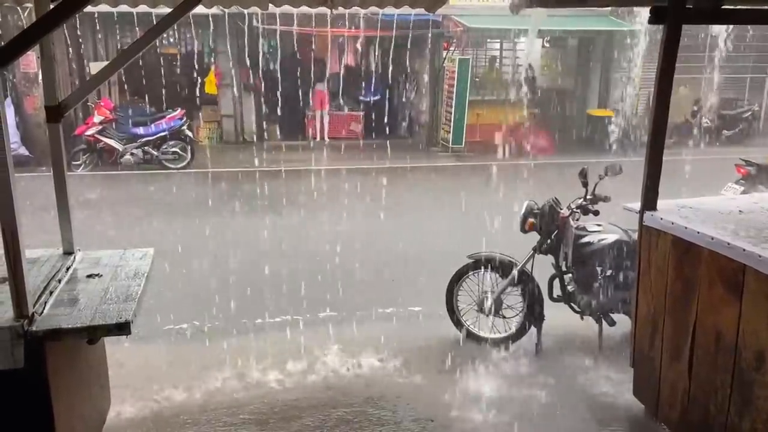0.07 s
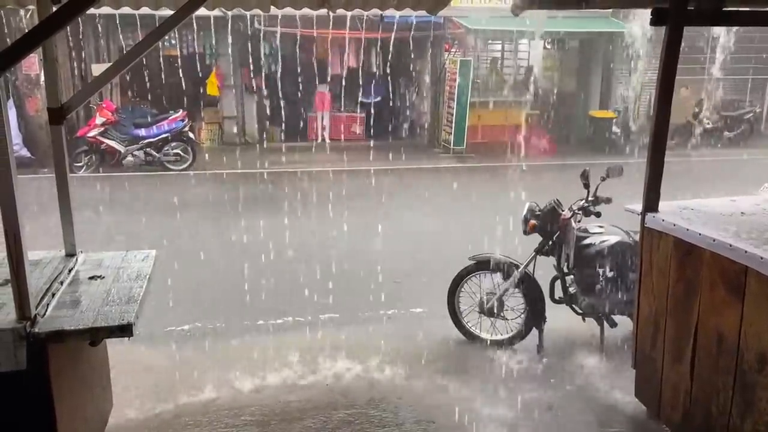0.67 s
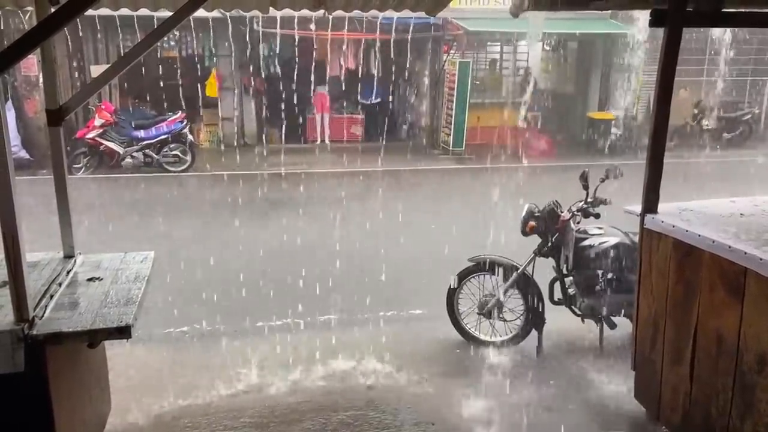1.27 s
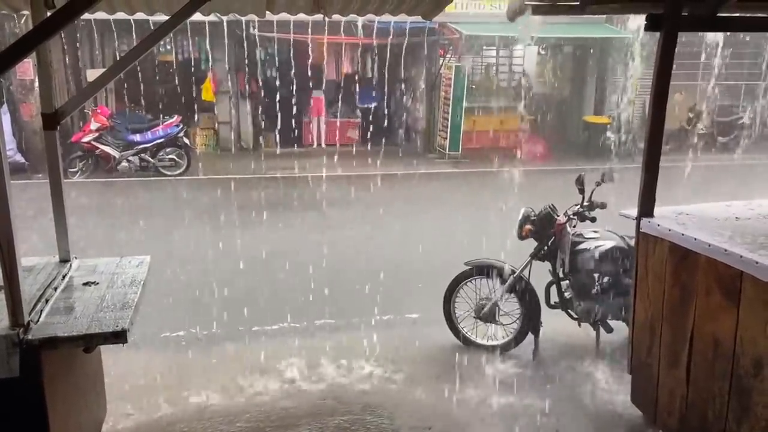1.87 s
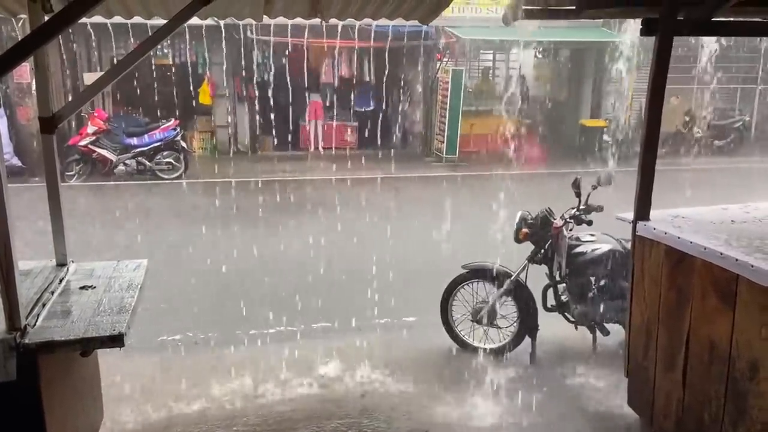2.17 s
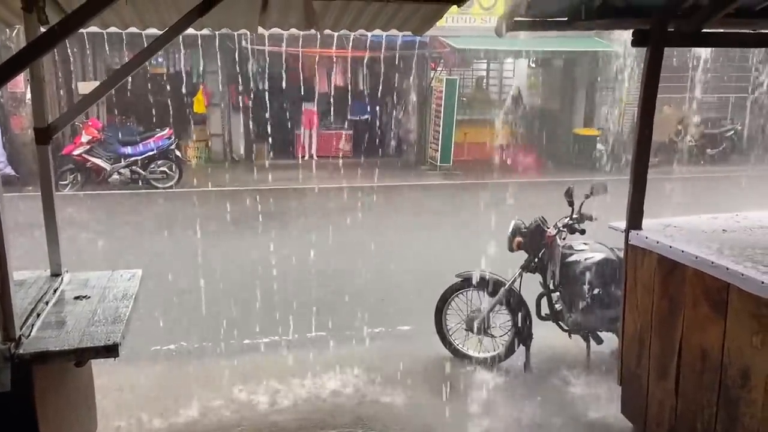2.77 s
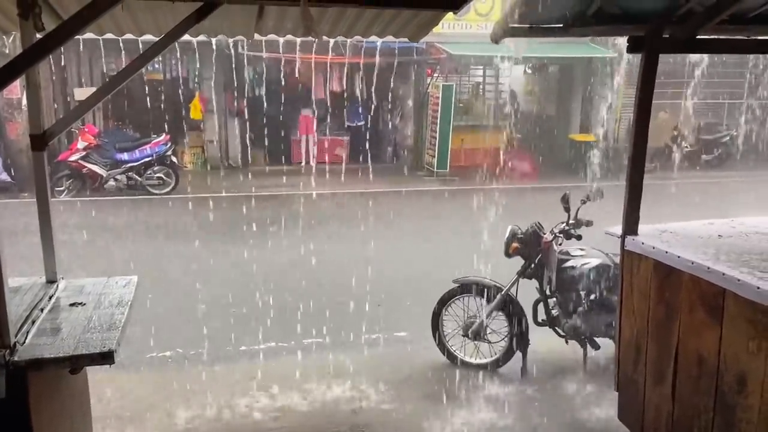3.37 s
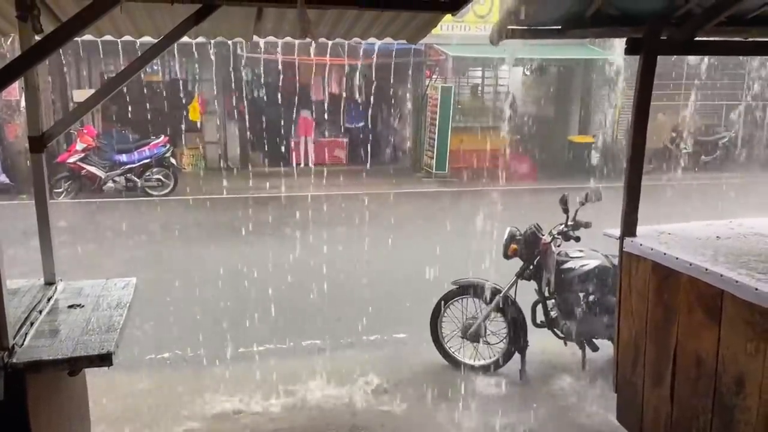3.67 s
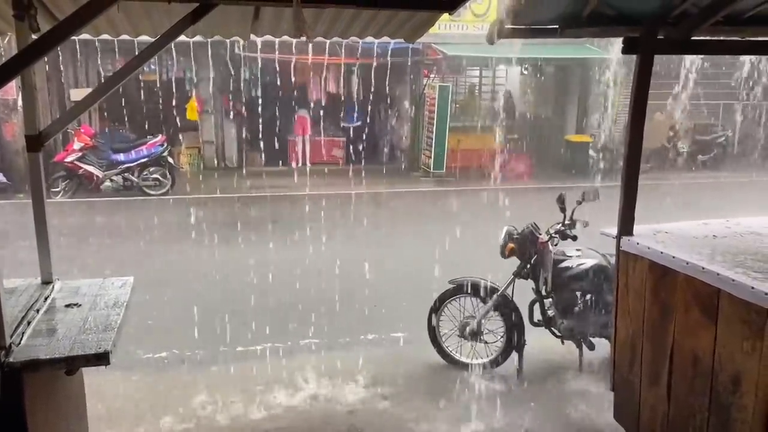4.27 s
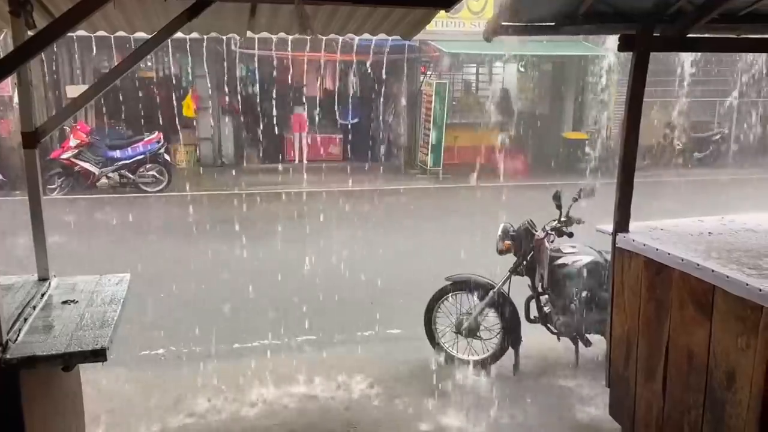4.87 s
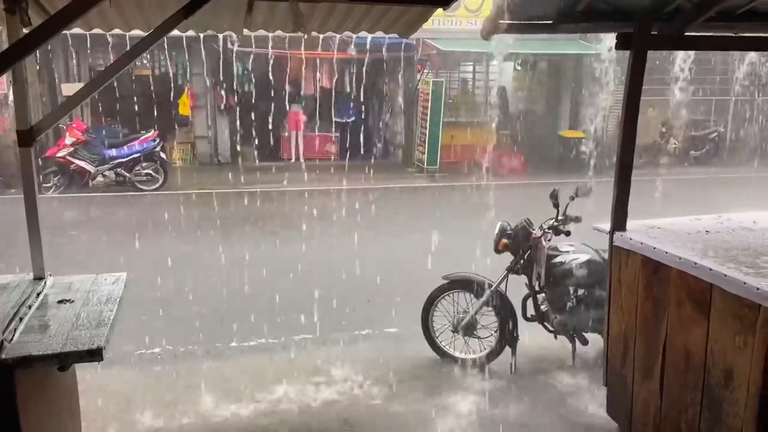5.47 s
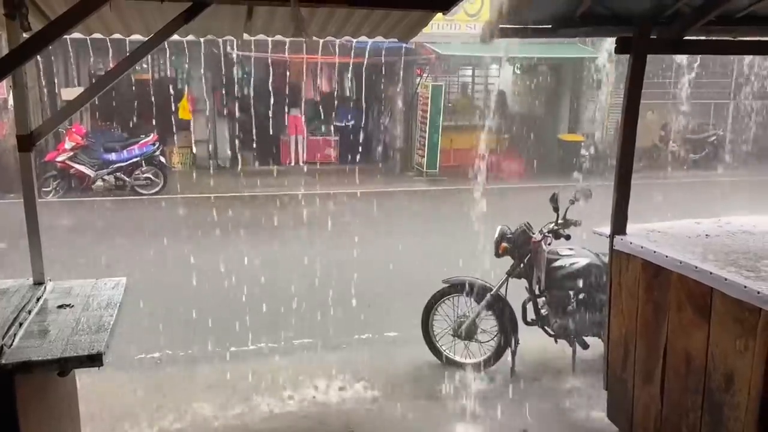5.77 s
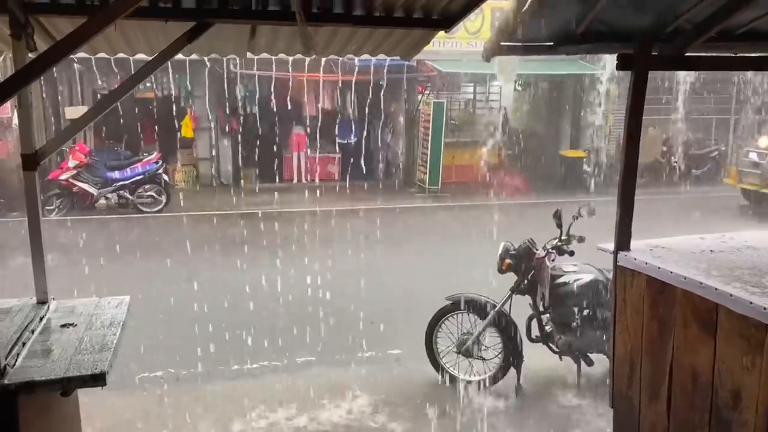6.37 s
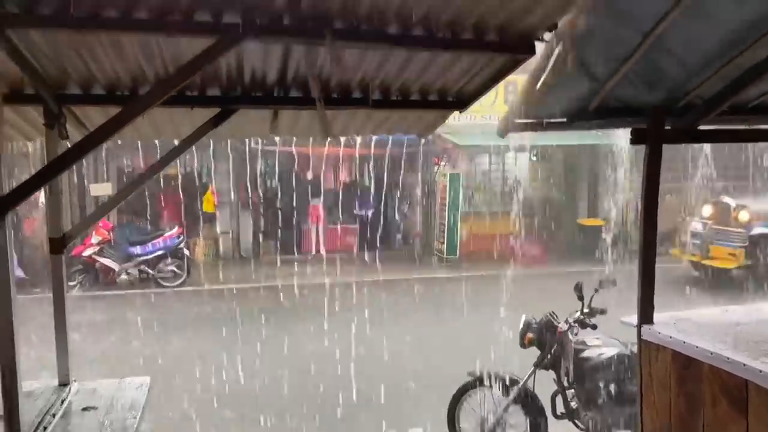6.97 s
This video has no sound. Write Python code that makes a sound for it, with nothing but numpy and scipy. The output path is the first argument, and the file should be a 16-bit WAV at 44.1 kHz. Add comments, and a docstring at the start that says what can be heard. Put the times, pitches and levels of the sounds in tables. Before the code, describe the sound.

A dense downpour drums on a metal roof just above a phone microphone at the side of a street. Run-off spatters and bubbles in the puddles close by, over a wide hiss of rain on the road. Big drips tap the tin at uneven moments. Beneath the rain two distant engines hum, one coming nearer, shifting gear and easing off near the end. The rain never lets up.

```python
"""A downpour drums on a tin roof overhead, heard from under it beside a street, on a two-port phone.
Dense drops push and ring the sheets, fat drips knock on them and heavy water thuds where they are slack.
In front, run-off from the eaves splashes and bubbles in the puddles; spray hisses from both sides.
Down the street one engine drones and another pulls closer through a gear change.
The phone limits the peaks."""
import sys
import numpy as np
from scipy import signal
from scipy.fft import rfft, irfft
from scipy.io import wavfile
from scipy.ndimage import uniform_filter1d, minimum_filter1d, map_coordinates

SR = 44100
rng = np.random.default_rng(int(sys.argv[2]) if len(sys.argv) > 2 else 0)


def dump(signal):
    """Clip the signal to [-1, 1] and save it as 16-bit WAV at the path in sys.argv[1]."""
    limited = np.clip(np.atleast_2d(signal).T, -1, 1)
    pcm = np.round(limited * 32767).astype(np.int16)
    wavfile.write(sys.argv[1], SR, pcm)


N = 310023
TIME = np.arange(N) / SR
FREQ = np.maximum(np.fft.rfftfreq(N, 1 / SR), 1)
LEFT_RIGHT = np.array([[1], [-1]])

# The engine droning down the street, its driver easing on and off the pedal.
# Each row: time in seconds, firing rate in Hz, relative level in dB.
DRONING_ENGINE = [(0, 99.4, -26), (0.3, 107.2, -25), (0.5, 111.7, -19), (0.77, 115, -16.5),
                  (1.02, 106.7, -20), (1.3, 113, -20), (1.68, 115.2, -26), (1.9, 114, -21),
                  (2.35, 110.5, -20), (2.55, 112, -26), (2.75, 114, -20), (3.05, 110.9, -25),
                  (3.35, 111.7, -24), (3.65, 117, -23), (4.1, 116.4, -41), (4.45, 111.2, -15.5),
                  (4.85, 110, -17.5), (5.35, 110.6, -20), (5.65, 108.9, -30), (5.95, 113.2, -18),
                  (6.12, 109.8, -26), (6.24, 108.8, -15.5), (6.6, 109.5, -18.5), (7.03, 111.3, -25)]
# The engine coming closer, which changes gear once and then lifts off.
# Each row: time in seconds, firing rate in Hz, relative level in dB.
APPROACHING_ENGINE = [(0.0, 135, -36), (1.2, 137, -29), (2.4, 134.7, -26), (2.8, 136.0, -23.5),
                      (3.3, 135.0, -27), (3.55, 141.6, -20), (3.8, 97.6, -31), (4.2, 95.1, -18),
                      (4.4, 98.3, -30), (4.65, 115.0, -32), (4.9, 119.7, -16), (5.15, 126.4, -18),
                      (5.45, 121.2, -21), (5.72, 123.0, -18.5), (6.0, 129.6, -22), (6.25, 100.0, -27),
                      (7.03, 96.0, -34)]
# The exhaust note. Each entry: relative level in dB of a multiple of the firing rate, from the first.
EXHAUST_ORDERS = [4, -19, -20.5, -17.5]

# How hard it rains on roof and street alike. Each row: time in seconds, relative strength in dB.
RAIN_STRENGTH = [(0, -0.5), (0.8, -0.5), (1.4, 0), (2.6, -0.1), (4.0, 0.5), (4.8, -0.8), (5.5, 0.5),
                 (7.03, 0.8)]
# Fine spray off the road. Each row: frequency in Hz, relative level in dB.
SPRAY_SPECTRUM = [(600, -72), (1600, -61), (2600, -65), (4000, -63), (5500, -64.5), (7000, -62.5),
                  (8500, -61.3), (11000, -64.2), (13000, -64), (15500, -64)]
# Surges and lulls over the eaves.
# Each row: middle in seconds, relative change of flow in dB, half length in seconds.
EAVES_SURGES = [(0.525, -1.5, 0.054), (0.93, -1.7, 0.046), (1.285, -2, 0.025), (1.991, -2, 0.032),
                (2.481, 0.5, 0.09), (2.952, -0.5, 0.027), (3.549, -1, 0.025), (3.902, 1.6, 0.076),
                (4, -2, 0.027), (4.736, 2.5, 0.029), (5.07, -2.5, 0.029), (5.521, 0.5, 0.1)]
# Run-off hitting the puddles in front. Each row: frequency in Hz, relative level in dB.
SPLASH_SPECTRUM = [(300, -64.5), (800, -54), (1300, -51.5), (1700, -56), (2250, -53.5), (3000, -58.5),
                   (4200, -59), (5500, -60.5), (7000, -62.5), (9000, -110), (16000, -64)]
# Fat gushes landing in the puddles.
# Each row: start in seconds, relative level in dB, length in seconds, centre pitch in Hz.
PUDDLE_GUSHES = [(0.036, -6, 0.1, 5200), (0.098, -4, 0.076, 2400), (0.345, -2, 0.06, 3000),
                 (1.202, 0, 0.043, 4800), (1.446, 0, 0.06, 4500), (2.149, -4, 0.049, 2430),
                 (2.246, 0, 0.041, 5500), (2.496, 1.5, 0.089, 4625), (2.825, 3, 0.05, 5200),
                 (3.08, -4, 0.046, 4800), (3.17, -1, 0.062, 2800), (3.39, -3, 0.066, 4200),
                 (3.64, -1, 0.05, 5030), (3.806, -4, 0.082, 4210), (3.897, -2, 0.06, 2290),
                 (4.072, 2, 0.026, 3200), (4.199, -1, 0.062, 2100), (4.277, -2, 0.04, 5500),
                 (5.272, -1, 0.07, 2303), (5.62, -1, 0.039, 5500), (5.96, -1, 0.069, 5200),
                 (6.43, 0, 0.046, 5000)]
# Big air pockets dragged under. Each row: start in seconds, relative level in dB, pitch in Hz.
AIR_GULPS = [(0.044, -4, 460), (0.268, -3, 483), (0.358, -6, 550), (0.806, -3, 555), (0.98, -10, 602),
             (1.115, -3, 432), (1.498, -4, 237), (1.8, -8, 213.3), (2.743, -9, 210), (2.831, -10, 585),
             (2.868, -4, 338.5), (3.094, -4, 408), (3.276, -5.5, 210), (3.395, -6, 259), (3.623, -8, 471),
             (3.869, -6, 254), (3.888, -3, 347.5), (3.912, -2, 350), (3.925, -6, 436), (3.94, -8, 283),
             (4.061, -4, 275), (4.363, -9, 466), (4.385, -10, 399), (4.535, -6, 236.4), (4.674, -10, 604),
             (5.293, -6, 300.7), (5.409, -4.5, 243), (5.45, -10, 256.6), (5.9, -5, 277.4),
             (6.365, -4.5, 350.5)]
# The bubbles nearest the phone. Each row: start in seconds, relative level in dB, pitch in Hz.
NEAR_PLINKS = [(0.063, -13, 4300), (1.162, -15, 2497), (1.306, -15, 2660), (1.465, -13, 3617),
               (1.493, -12, 3617), (2.481, -16, 4460), (3.204, -15, 3789), (3.854, -17, 3660),
               (3.894, -12, 2610), (3.933, -13, 2960), (4.228, -13, 2067)]

# Heavy water on the slack roof. Each row: start in seconds, relative level in dB, pitch in Hz.
ROOF_THUDS = [(0.048, -9, 112), (0.141, -3, 84.6), (0.224, -7, 62.3), (0.268, -8, 81), (0.362, -14, 58.6),
              (0.42, -1, 213), (0.648, -3, 162), (0.698, -2, 126), (0.75, -14, 61.6), (1.01, -15, 68),
              (1.095, -9, 65), (1.2, -19, 68), (1.244, -4, 180), (1.309, -4, 171), (1.95, -5, 172),
              (3.549, -2, 142), (4.135, -6, 160)]
# Big drips on the tin. Each row: start in seconds, relative level in dB, pitch of the spot in Hz.
DRIP_KNOCKS = [(0.036, -5.5, 1180), (0.055, -9, 1040), (0.377, -5, 980), (1.02, -9, 1065), (1.13, -7, 988),
               (1.155, -4, 970), (1.34, -6, 840), (1.424, -6, 800), (1.476, -6, 837), (1.64, -10, 1202),
               (1.792, -3, 991), (2.094, -12, 1080), (2.298, -4, 992), (2.56, -3, 917), (2.599, -3.5, 960),
               (2.641, -6, 1066), (2.833, -5, 994), (3.278, -4, 876), (3.314, -3, 1006), (3.347, -5, 950),
               (3.381, -5, 962), (3.435, -7, 1034), (3.487, -8, 1042), (3.61, -6, 1154), (3.664, -3, 1080),
               (3.741, -4, 866), (3.871, -5, 970), (3.936, -6, 1282), (4.08, -10, 1226), (4.222, -7, 1066),
               (4.243, -5, 874), (4.354, -8, 1186), (4.502, -6, 1090), (4.521, -14, 858), (5.017, -3, 1091),
               (5.027, 1, 1003), (5.04, -5, 1060), (5.051, -8, 890), (5.301, -5, 1100), (6.256, -5, 845),
               (6.294, -6, 870), (6.658, -9, 1096), (6.735, -4, 854), (6.953, -6, 1135), (7.0, -10, 1005)]
# The modes of the tin. Each row: pitch in Hz, width in Hz, relative level at the start in dB,
# change in dB per second as the rain shifts over the sheets.
TIN_MODES = [(372.6, 11, -3.5, -0.5), (733, 27, -5.5, -0.5), (852.5, 24, 1, 0.73), (951, 21, 2, -0.55),
             (988, 18, 1, 1), (1104, 69, -2, 0.07)]
# The boom of the sheets overhead. Each row: frequency in Hz, relative level in dB.
DRUM_SPECTRUM = [(20, -73), (32, -67), (45, -41), (60, -41), (85, -40.5), (120, -35.5), (160, -42.5),
                 (215, -39), (290, -44.5), (450, -43.5), (620, -49), (780, -45.5), (1200, -50),
                 (2000, -113)]
# How wide the drumming sits. Each row: frequency in Hz, side minus mid in dB.
DRUM_SPREAD = [(60, -20), (120, -17), (200, -12.5), (380, -7.5), (620, 0.5), (1000, -12.5)]
# The drumming leans right in the bass. Each row: frequency in Hz, left minus right in dB.
DRUM_BALANCE = [(60, -3.5), (120, 0), (380, -2), (600, 2.5), (1000, 0.5)]


def undb(db):
    """Decibels to gain."""
    return np.exp(np.asarray(db) * (np.log(10) / 20))


def unit(x):
    """Scale to rms 1."""
    return x / np.sqrt(np.mean(x ** 2))


def curves(table):
    """Each column of a time table, joined by straight lines."""
    times, *columns = np.transpose(table)
    return [np.interp(TIME, times, column) for column in columns]


def shape(points):
    """Gain at every frequency from (Hz, dB) points."""
    hz, db = np.transpose(points)
    return undb(np.interp(np.log(FREQ), np.log(hz), db))


def colour(x, points):
    """Give white sound of rms 1 a spectrum in dB per Hz."""
    return irfft(rfft(x) * shape(points) * np.sqrt(SR / 2), N)


def delay(x, lag_s):
    """Shift a sound later, as on its way to the farther microphone port."""
    return irfft(rfft(x) * np.exp(-2j * np.pi * FREQ * lag_s), N)


def walk(per_s):
    """Smooth chance of rms 1 that changes about per_s times a second."""
    knots = signal.resample_poly(rng.standard_normal(2048), 4, 1)
    return unit(np.interp(TIME * per_s * 4, np.arange(len(knots)), knots))


def drops(per_s, spread_db):
    """Impacts at random moments, with sizes scattered in dB."""
    hit = rng.random(N) < per_s / SR
    polarity = np.sign(rng.standard_normal(N))
    return unit(hit * polarity * undb(spread_db * rng.standard_normal(N)))


def clumps(x, low_hz, high_hz, clump_db, per_s, bands):
    """Drops land in clumps of like size, so each pitch range swells on its own."""
    hz, times, frames = signal.stft(x, SR, nperseg=256)
    band = np.interp(np.log(hz + 1), np.log([low_hz, high_hz]), [0, bands - 1])
    grid = np.meshgrid(band, times * per_s, indexing="ij")
    swell = map_coordinates(rng.standard_normal((bands, 2048)), grid, order=1)
    _, clumped = signal.istft(frames * undb(clump_db * swell), SR)
    return unit(clumped[:, :N])


def add_ring(out, start_s, hz, gain, cycles, rise=0, onset=0):
    """Add a tone that decays over some cycles; onset is a share of that decay, rise a share of pitch."""
    start = int(start_s * SR)
    t = TIME[:min(int(5 * cycles / hz * SR), N - start)]
    age = hz * t / cycles
    build = 1 - np.exp(-age / onset) if onset > 0 else 1
    tone = np.sin(2 * np.pi * hz * t * (1 + rise * age / 2))
    out[:, start:start + len(t)] += gain * build * np.exp(-age) * tone


def rings(events, gain_db, cycles, rise=0, onset=0):
    """One dying tone for each (start, level, pitch) row, alike at both ports."""
    out = np.zeros((2, N))
    for start_s, db, hz in events:
        add_ring(out, start_s, hz, undb(db + gain_db), cycles, rise, onset)
    return out


def pan(place):
    """Equal-power gains of the two ports, from 0 (right) to 1 (left)."""
    return np.sqrt([[place], [1 - place]])


def pips(count, low_hz, high_hz, cycles, spread_db, small_db, rise=0):
    """Short rings at random moments and places; the smaller their cause, the higher and fainter."""
    out = np.zeros((2, N))
    for (when, smallness, place, push), loud in zip(rng.random((count, 4)), rng.standard_normal(count)):
        hz = low_hz * (high_hz / low_hz) ** smallness
        gain = np.sign(push - .5) * undb(spread_db * min(loud, 2) + small_db * smallness)
        add_ring(out, when * N / SR, hz, gain * pan(place), cycles, rise)
    return unit(out)


def engine(drive, gain_db=0.5, waver=0.0027, rough_db=-0.3, lope=0.12, half_order_db=-16):
    """A six-cylinder exhaust far down the street: only its lowest orders carry through the rain."""
    firing_hz, db = curves(drive)
    phase = 2 * np.pi * np.cumsum(firing_hz * (1 + waver * walk(per_s=13.1))) / SR
    note = sum(undb(order_db) * np.sin(k * phase) for k, order_db in enumerate(EXHAUST_ORDERS, 1))
    # unequal cylinders make it putter once in six firings and alternate strong and weak
    note = note * (1 + lope * np.cos(phase / 6)) + undb(half_order_db) * np.sin(phase / 2)
    return unit(note) * undb(db + gain_db + rough_db * walk(per_s=19))


def shower(depth, flutter_db, per_s):
    """Gain of a layer that follows the strength of the rain and flutters by chance."""
    rain_db, = curves(RAIN_STRENGTH)
    return undb(depth * rain_db + flutter_db * walk(per_s))


def spray(flicker_db=0.46, port_lag_s=1 / 3700):
    """Fine droplets hiss from up and down the street and reach the far port a little late."""
    sides = np.array([drops(per_s=12000, spread_db=1.5) for _ in range(2)])
    ports = sides + delay(sides[::-1], port_lag_s)
    hiss = clumps(ports, low_hz=2860, high_hz=14800, clump_db=2.0, per_s=110, bands=24)
    return colour(hiss, SPRAY_SPECTRUM) * undb(flicker_db * walk(per_s=300))


def surges():
    """Relative flow off the eaves in dB: each surge or lull builds and passes."""
    return sum(db * np.exp(-((TIME - middle_s) / half_s) ** 2) for middle_s, db, half_s in EAVES_SURGES)


def splashes(side_db=-1.5, flutter_db=0.42, gain_db=1.07):
    """Strings of water off the eaves hit the puddles unevenly, in front of the phone."""
    mid, side = (drops(per_s=14000, spread_db=2.5) for _ in range(2))
    ports = mid + LEFT_RIGHT * undb(side_db) * side
    impacts = clumps(ports, low_hz=672, high_hz=8950, clump_db=2.0, per_s=85, bands=36)
    return colour(impacts, SPLASH_SPECTRUM) * undb(gain_db + flutter_db * walk(per_s=28))


def spatter(gain_db=-29.5):
    """Separate drops off the eaves smack the wet ground close by, each a very short pip."""
    smacks = pips(count=1600, low_hz=1400, high_hz=6000, cycles=3.8, spread_db=3.0, small_db=-4)
    return undb(gain_db) * smacks


def shelter(x, echo_db=-0.5, decay_s=0.006):
    """Roof, counter and wet ground around the phone throw each smack back at once and soften its edge."""
    t = TIME[:SR // 20]
    tail = rng.standard_normal((2, len(t))) * np.exp(-t / decay_s)
    tail /= np.linalg.norm(tail, axis=1, keepdims=True)
    echoes = signal.fftconvolve(x, tail, axes=1)[:, :N]
    return (x + undb(echo_db) * echoes) / np.hypot(1, undb(echo_db))


def bubbles(gain_db=-31):
    """Little bubbles ring all over the puddles, each rising in pitch as it nears the surface."""
    fizz = pips(count=800, low_hz=1300, high_hz=8000, cycles=36, spread_db=4.0, small_db=-3, rise=0.0178)
    return undb(gain_db) * fizz


def gushes(gain_db=-21.0, drops_per_s=4500, spread_octaves=0.497, spread_db=1.0):
    """A fat gush breaks on the puddle into a cloud of droplets, thickest at its middle."""
    out = np.zeros((2, N))
    for start_s, db, length_s, centre_hz in PUDDLE_GUSHES:
        count = int(drops_per_s * length_s)
        landings = rng.random((512, 3))[:count]
        sizes = np.clip(rng.standard_normal((512, 2))[:count], -2, 2)
        for (early, late, place), (pitch, loud) in zip(landings, sizes):
            landing_s = start_s + length_s * (early + late) / 2
            hz = centre_hz * 2 ** (spread_octaves * pitch)
            gain = undb(db + gain_db + spread_db * loud)
            add_ring(out, landing_s, hz, gain * pan(place), cycles=2.3)
    return out


def gulps():
    """The heaviest run-off drags big, hollow-sounding bubbles under."""
    return rings(AIR_GULPS, gain_db=-4.5, cycles=5, rise=0.024)


def plinks():
    """The bubbles nearest the phone ring out above the wash."""
    return rings(NEAR_PLINKS, gain_db=-4.0, cycles=22, rise=0.023)


def roof_patter(gain_db=-27.5):
    """Larger drops tap all over the roof, each spot with its own short, hollow note."""
    taps = pips(count=800, low_hz=240, high_hz=1250, cycles=5.0, spread_db=1.5, small_db=-2)
    return undb(gain_db) * taps


def roof_thuds():
    """Heavy water lands on the slack roof: a dull boom that dies in a few swings."""
    return rings(ROOF_THUDS, gain_db=-3.0, cycles=2.6)


def roof_knocks(gain_db=-4.0, cycles=11.6, onset=0.25, neighbour_db=-10.0, mode_ratio=1.11):
    """Fat drips strike the wet tin: each spot knocks at its own pitch, with a weaker mode either side."""
    neighbours = [(start_s, db + neighbour_db, side_hz) for start_s, db, hz in DRIP_KNOCKS
                  for side_hz in (hz / mode_ratio, hz * mode_ratio)]
    spots = rings(DRIP_KNOCKS, gain_db, cycles, onset=onset)
    return spots - rings(neighbours, gain_db, cycles, onset=onset)


def tin_sheet(strikes, swell_db):
    """The modes of the roof sheet ring; each swells and fades as the drops favour other spots."""
    spectrum, out = rfft(strikes), 0
    for k, (hz, width_hz, db, db_per_s) in enumerate(TIN_MODES):
        detuning = (FREQ ** 2 - hz ** 2) / (FREQ * width_hz)
        mode = irfft(spectrum / (1 + 1j * detuning), N)
        out = out + (-1) ** k * mode * undb(db + db_per_s * TIME + swell_db * walk(per_s=3))
    return unit(out)


def roof_ringing(gain_db=-21.0, side_db=-8.0, lag_s=0.00015, drift=0.003993):
    """Hundreds of drops a second keep the tin ringing overhead; it reaches the left port first."""
    mid = drops(per_s=700, spread_db=2.5)
    side = undb(side_db) * drops(per_s=1500, spread_db=3.5)
    # water running over the tin detunes it
    warped_clock = np.cumsum(1 + drift * walk(per_s=4))
    ringing = tin_sheet(mid + LEFT_RIGHT * side, swell_db=1.0)
    left, right = (map_coordinates(port, [warped_clock], order=1, mode="mirror") for port in ringing)
    return undb(gain_db) * np.array([left, delay(right, lag_s)])


def roof_drumming(gain_db=-0.9, lag_s=0.00014):
    """Drops push whole sheets overhead; the long waves reach both ports almost alike."""
    mid = drops(per_s=1500, spread_db=1.5)
    side = irfft(rfft(drops(per_s=1500, spread_db=3.5)) * shape(DRUM_SPREAD), N)
    balance = shape(DRUM_BALANCE) ** (LEFT_RIGHT / 2)
    left, right = irfft(rfft(mid + LEFT_RIGHT * side) * balance, N)
    return undb(gain_db) * colour(np.array([left, delay(right, lag_s)]), DRUM_SPECTRUM)


def scene():
    """Roof overhead, water in front and to the sides, engines far off and a little to the right."""
    drumming = roof_drumming() * shower(depth=0.09, flutter_db=0.5, per_s=22)
    ringing = roof_ringing() * shower(depth=0.9, flutter_db=0.5, per_s=13)
    roof = drumming + ringing + roof_patter() + roof_knocks() + roof_thuds()
    flow = shower(depth=0.42, flutter_db=0.41, per_s=27) * undb(-0.55)
    surge_db = surges()
    run_off = (splashes() + shelter(spatter()) + bubbles()) * undb(0.95 * surge_db)
    hiss = spray() * undb(1.4 * surge_db)
    water = (run_off + hiss) * flow + gushes() + gulps() + plinks()
    traffic = engine(DRONING_ENGINE) + engine(APPROACHING_ENGINE)
    return roof + water + traffic * undb(-.5 * LEFT_RIGHT)


def record(dry, gain_db=0.89, ceiling=1.003, attack_s=0.00076, release_db_per_s=350, top_hz=15700):
    """The phone ducks at each peak and recovers, clips at full scale and cuts the top."""
    loud = dry * undb(gain_db)
    over_db = 20 * np.log10(np.maximum(np.abs(loud).max(axis=0) / ceiling, 1))
    recovery_db = release_db_per_s * TIME
    duck_db = np.maximum.accumulate(over_db + recovery_db) - recovery_db
    attack = int(attack_s * SR)
    duck = uniform_filter1d(minimum_filter1d(undb(-duck_db), attack), attack)
    limited = np.clip(loud * duck, -1, 1)
    low_pass = signal.ellip(10, .1, 70, top_hz, fs=SR, output="sos")
    return signal.sosfilt(low_pass, limited)


dry = scene()
out = record(dry)
dump(out)
```